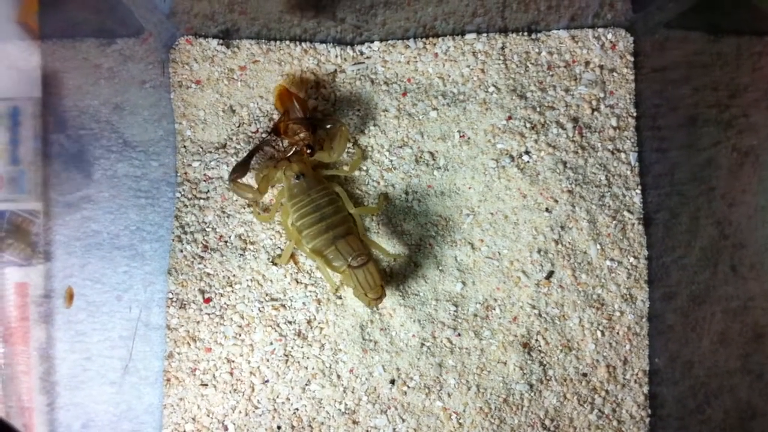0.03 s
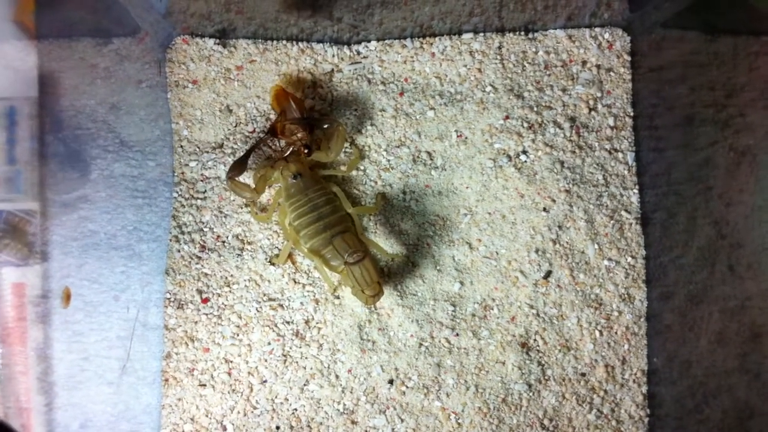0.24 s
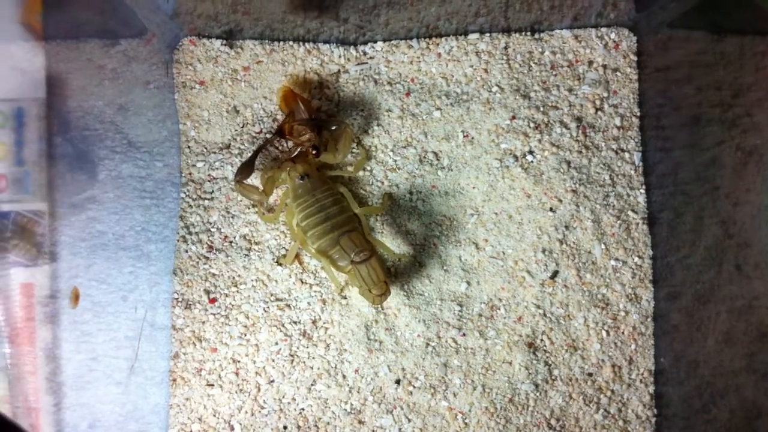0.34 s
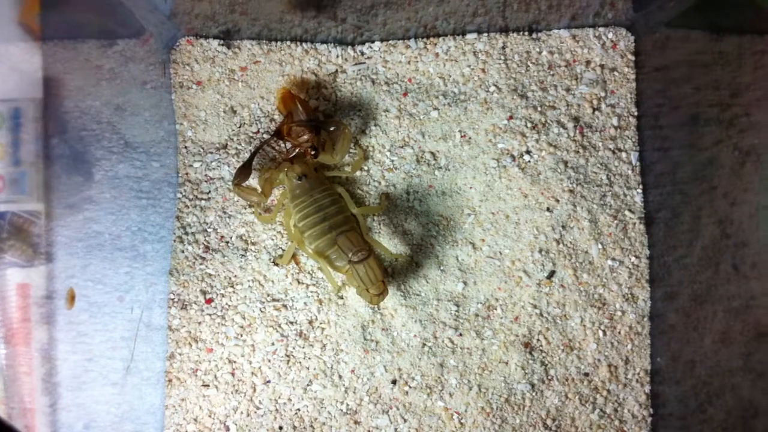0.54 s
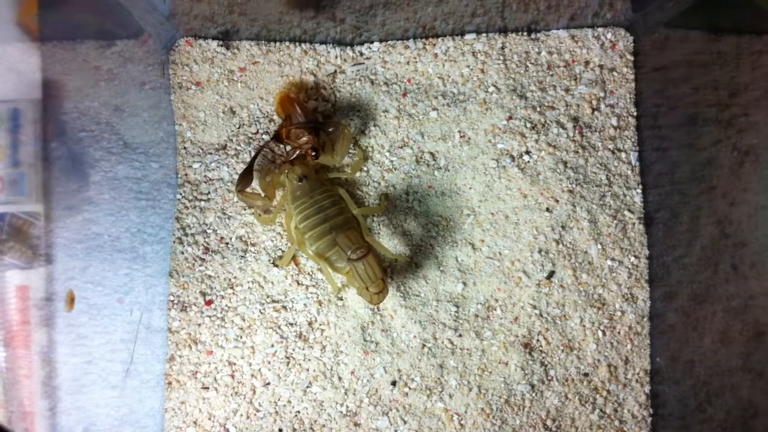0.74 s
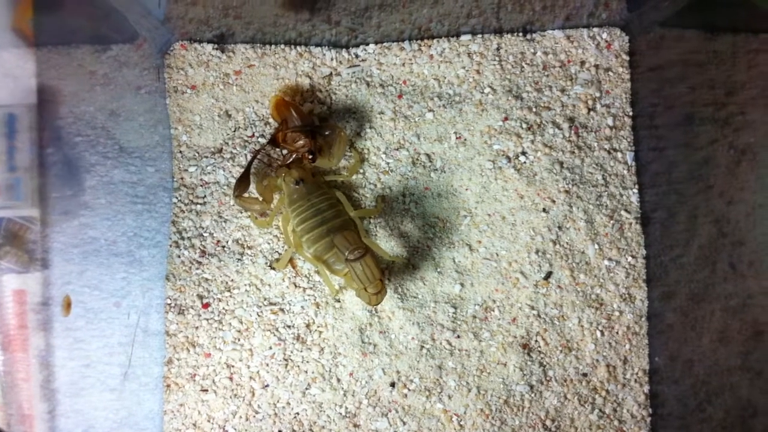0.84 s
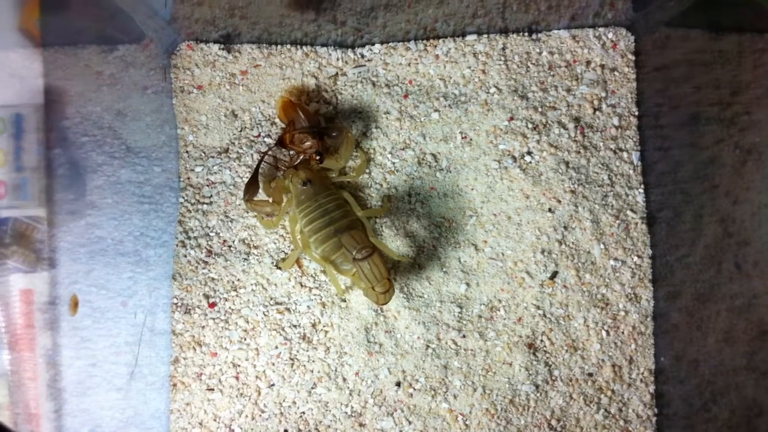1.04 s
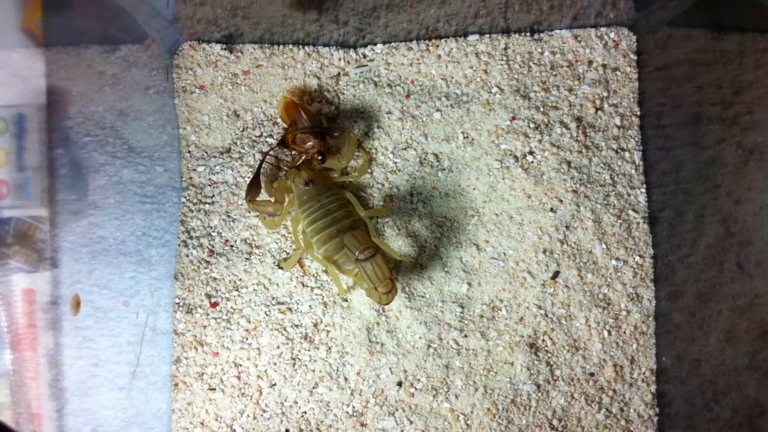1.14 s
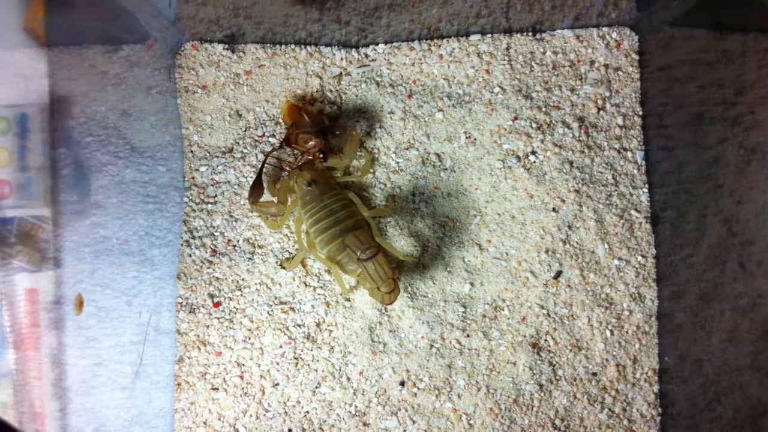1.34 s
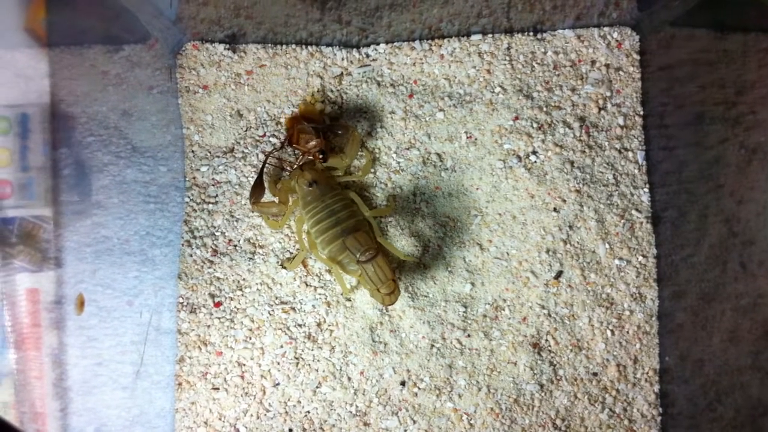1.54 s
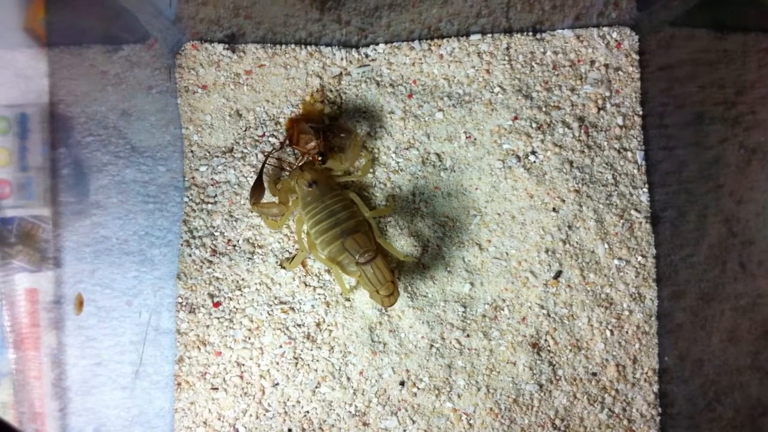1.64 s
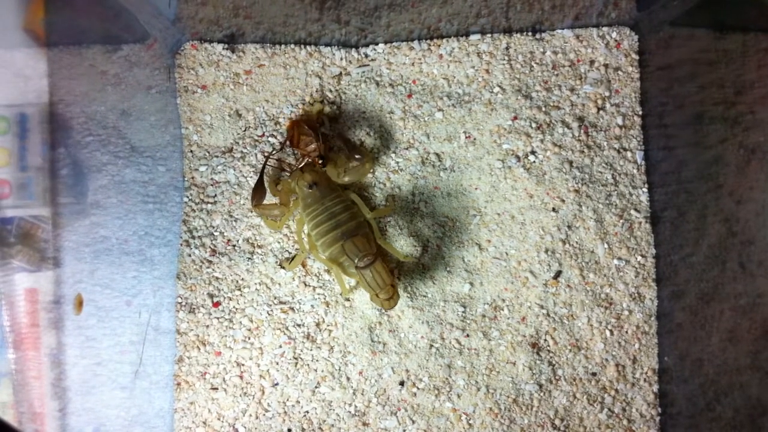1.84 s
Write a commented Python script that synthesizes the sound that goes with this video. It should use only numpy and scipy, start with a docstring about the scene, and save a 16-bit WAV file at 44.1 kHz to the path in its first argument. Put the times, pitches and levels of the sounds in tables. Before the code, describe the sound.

A dry knock, then a brief scrape of sand and a light tick, close up.

```python
"""One dry, dull knock, heard close to a small sand-floored enclosure in a quiet room.
A gritty scrape of tiny slips follows, grows brighter and stops dead; then a hard part ticks lightly.
Faint rustles in the sand and soft, low bumps come mostly later, a few just ahead of the knock.
The room's low murmur and a steady hiss lie under it all, on one close microphone."""
import sys
import numpy as np
from scipy import signal
from scipy.fft import rfft, irfft
from scipy.io import wavfile
from scipy.ndimage import uniform_filter1d

SR = 44100
rng = np.random.default_rng(int(sys.argv[2]) if len(sys.argv) > 2 else 0)


def materialize(psi):
    """Save the field psi as 16-bit PCM at rate SR to the path in sys.argv[1].

    A 1-D psi becomes a single channel; in a 2-D psi each row is a channel.
    """
    bounded = np.clip(np.atleast_2d(psi).T, -1, 1)
    quanta = np.round(bounded * 32767).astype(np.int16)
    wavfile.write(sys.argv[1], SR, quanta)


N = 83790
FREQ_HZ = np.fft.rfftfreq(N, 1 / SR)
TOP_HZ = 15750


def undb(db):
    """Decibels to gain."""
    return 10 ** (np.asarray(db) / 20)


def unit(x):
    """Scale to rms 1."""
    return x / np.sqrt(np.mean(x ** 2))


def gains(points):
    """Gain at every frequency from (freq_hz, level_db) points."""
    hz, db = np.array(points).T
    return undb(np.interp(np.log(np.maximum(FREQ_HZ, 1)), np.log(hz), db))


def colour(x, points):
    """Give a steady sound a spectrum, at rms 1."""
    return unit(irfft(rfft(x) * gains(points), N))


def respond(x, points):
    """Causal response of a heavily damped body with this spectrum."""
    cepstrum = irfft(np.log(gains(points)), N)
    causal_fold = 1 + np.sign(N / 2 - np.arange(N)) * (np.arange(N) > 0)
    return irfft(rfft(x) * np.exp(rfft(cepstrum * causal_fold)), N)


def ring(age, hz, t60):
    """One decaying mode, silent before its start."""
    age = np.maximum(age, 0)
    return np.sin(2 * np.pi * hz * age) * np.exp(-np.log(1000) * age / t60)


def grains(slips_per_s=6500, spread_db=3):
    """Dense tiny slips of uneven size."""
    slipping = rng.random(N) < slips_per_s / SR
    direction = np.sign(rng.standard_normal(N))
    size_db = spread_db * np.minimum(rng.exponential(size=N), 4)
    return slipping * direction * undb(size_db)


# Room tone around the enclosure: freq_hz, density_db
MURMUR_SPECTRUM = [(25, -40), (50, -25), (80, -11), (115, -4), (150, 2), (205, -6), (240, -3), (290, -10),
                   (420, -7.5), (530, -10.5), (680, -15.5), (840, -10), (1100, -17.5), (1500, -22.5),
                   (2200, -27.5), (5000, -43.5), (16000, -50)]

def room_murmur(level_db=-58, waver_db=.27):
    """The quiet room's low murmur, wavering slightly."""
    window = int(SR / 12)
    waver = unit(uniform_filter1d(uniform_filter1d(rng.standard_normal(N), window), window))
    return colour(rng.standard_normal(N), MURMUR_SPECTRUM) * undb(level_db + waver_db * waver)


# Noise floor at the microphone: freq_hz, density_db
HISS_SPECTRUM = [(100, -4), (2500, 0), (4000, 0), (6000, -2), (8800, -3), (9800, -0.5), (10800, -3),
                 (11700, -3.5), (12300, -4.5), (14000, -4.5), (16000, -2.5)]

def hiss(level_db=-68):
    """A smooth, steady hiss."""
    return undb(level_db) * colour(rng.standard_normal(N), HISS_SPECTRUM)


# The sand floor, faint even this close: peak_s, width_s, level_db, centre_hz
SAND_RUSTLES = [(.008, 0.0027, -61, 1700), (.008, .003, -67, 6460), (.774, .006, -64, 11300),
                (.776, .016, -69.5, 5270), (.85, .011, -67.5, 9500), (.869, .003, -60.5, 10700),
                (.872, 0.012, -67, 2280), (.903, .005, -66.5, 1930), (.905, 0.026, -73, 5000),
                (1.452, 0.017, -74.5, 6500), (1.781, .003, -67, 6360)]

def sand_rustles(t, half_width_octaves=.5):
    """Brief swells of fine grains, each in its own broad band."""
    out = 0
    for peak_s, width_s, level_db, centre_hz in SAND_RUSTLES:
        octaves = np.log2(np.maximum(FREQ_HZ, 1) / centre_hz)
        band = 1 / (1 + (octaves / half_width_octaves) ** 2)
        sand = unit(irfft(rfft(grains()) * band, N))
        swell = np.exp(-.5 * ((t - peak_s) / width_s) ** 2)
        out += undb(level_db) * sand * swell
    return out


# Soft bumps near the microphone: start_s, level_db
SOFT_BUMPS = [(.106, -51), (0.876, -52), (.884, -42.5), (1.029, -43)]

def bumps(t, pitch_hz=163, t60_s=.051, attack_s=.0035):
    """Soft nudges stir one low mode."""
    out = 0
    for start_s, level_db in SOFT_BUMPS:
        age = t - start_s
        out += undb(level_db) * np.clip(age / attack_s, 0, 1) * ring(age, pitch_hz, t60_s)
    return out


# Modes of a small hard part, close by: pitch_hz, level_db, t60_s
HARD_PART_MODES = [(1000, -55, .012), (1415, -42.5, 0.012), (1540, -36.5, 0.016), (2480, -47, 0.0079),
                   (3390, -43, 0.012), (3800, -40.5, 0.0077)]

def tick(t, start_s=.4133, attack_s=.00064, cutoff_hz=5200):
    """A small hard part rings for a few milliseconds; the soft contact leaves no high treble."""
    age = t - start_s
    modes = sum(undb(db) * ring(age, hz, t60) for hz, db, t60 in HARD_PART_MODES)
    attack = np.clip(age / attack_s, 0, 1)
    return signal.sosfilt(signal.butter(10, cutoff_hz, fs=SR, output="sos"), attack * modes)


# Slipping grit at close range: freq_hz, density_db
GRIT_SPECTRUM = [(300, -17), (800, 1.5), (1200, -4.5), (1900, -11), (2400, 4), (3000, -4.5), (4500, -1),
                 (5700, -5), (7000, 3), (8800, -5.5), (11500, -1.5), (13300, -11), (15000, -4)]
# The body's rumble under the grit: freq_hz, density_db
RUMBLE_SPECTRUM = [(40, -29), (100, -8), (170, 5), (270, -2), (400, -10), (600, -11), (800, -9),
                   (1100, -17), (2000, -23), (6000, -60)]
# Course of that rumble at the microphone: time_s, level_db
RUMBLE_ENVELOPE = [(.21, -48), (.228, -46.5), (.25, -55.5), (.275, -50), (.305, -49), (.316, -42),
                   (.33, -46.5), (.345, -47.5)]

def scrape(t, start_s=.202, end_s=.3455, attack_s=.0015, release_s=.0033):
    """Grit slips louder and brighter as the motion speeds up; the body rumbles until it stops."""
    grit_db, rise_db, fizz_db = -53.5, 9.5, -14.5
    speed = np.clip((t - start_s) / (end_s - start_s), 0, 1) ** 2.08
    contact = np.clip((t - start_s) / attack_s, 0, 1) * np.clip((end_s - t) / release_s, 0, 1)
    edge_hz = np.interp(speed, [0, 1], [5300, 9830])
    slips = rfft(colour(grains(), GRIT_SPECTRUM))
    grit, step_hz = 0, 500
    # Bands open as the upper edge climbs; a faint fizz stays above it.
    for centre_hz in np.arange(0, TOP_HZ + step_hz, step_hz):
        band = irfft(slips * np.maximum(1 - abs(FREQ_HZ - centre_hz) / step_hz, 0), N)
        opening = 1 / (1 + (centre_hz / edge_hz) ** 10)
        grit += band * np.hypot(opening, undb(fizz_db))
    rumble_db = np.interp(t, *np.array(RUMBLE_ENVELOPE).T)
    rumble = colour(grains(), RUMBLE_SPECTRUM) * undb(rumble_db)
    return contact * (grit * undb(grit_db + rise_db * speed) + rumble)


# The knocked body, heard up close: freq_hz, gain_db
BODY_RESPONSE = [(35, -48), (80, -20), (125, -6), (190, -1), (297, -6), (480, -6), (663, -11), (860, -8),
                 (1410, -14), (2000, -23.5), (2600, -7.5), (3200, -12.5), (4500, -18), (5800, -18.5),
                 (7000, -21), (8300, -12), (10200, -21.5), (11500, -18), (13600, -24), (16000, -22)]

def knock(start_s=.2013, force_db=-1.5, contact_s=.000398, sag=.41):
    """One very short, sagging push into the damped body."""
    age_samples = np.arange(N) - np.round(start_s * SR)
    contact_samples = contact_s * SR
    contact = (age_samples >= 0) * np.clip(contact_samples - age_samples, 0, 1)
    push = contact * (1 - sag * age_samples / contact_samples)
    return undb(force_db) * respond(push, BODY_RESPONSE)


def scene():
    """All sources at one microphone close to the enclosure."""
    t = np.arange(N) / SR
    return (knock() + scrape(t) + tick(t) + sand_rustles(t) + bumps(t) + room_murmur() + hiss())[None]


def record(dry):
    """The recorder cuts the top steeply."""
    return signal.sosfilt(signal.ellip(10, .1, 70, TOP_HZ, fs=SR, output="sos"), dry)


dry = scene()
out = record(dry)
materialize(out)
```